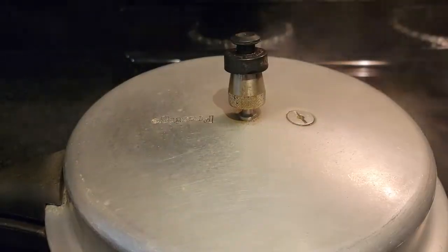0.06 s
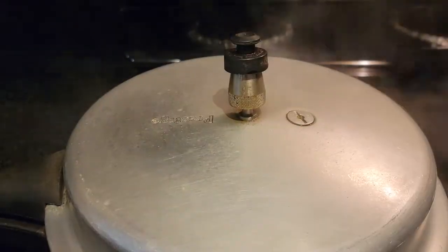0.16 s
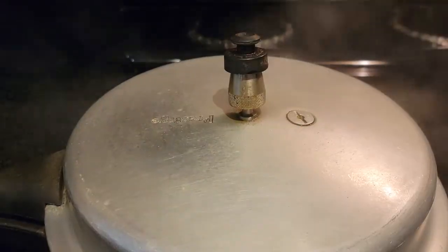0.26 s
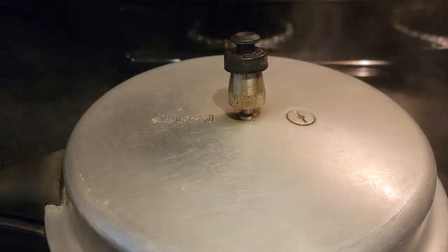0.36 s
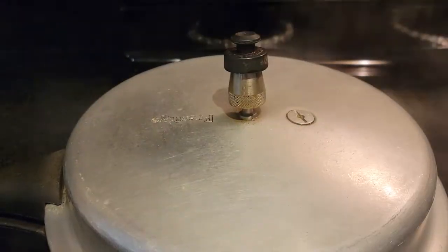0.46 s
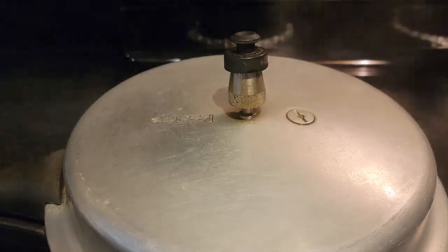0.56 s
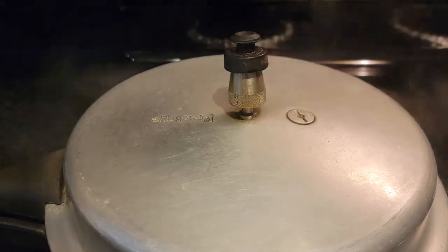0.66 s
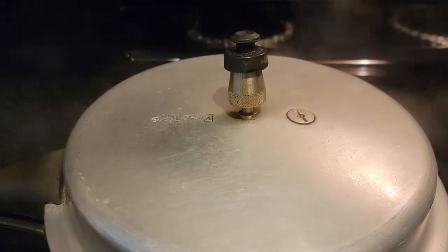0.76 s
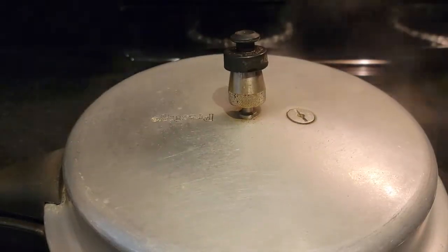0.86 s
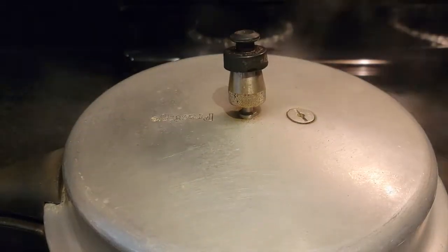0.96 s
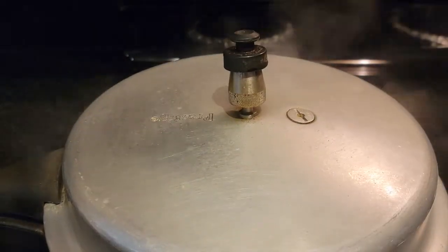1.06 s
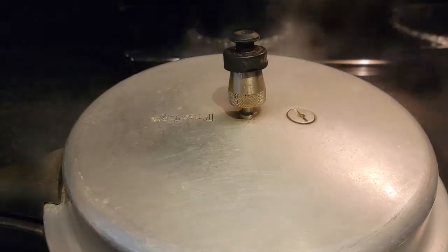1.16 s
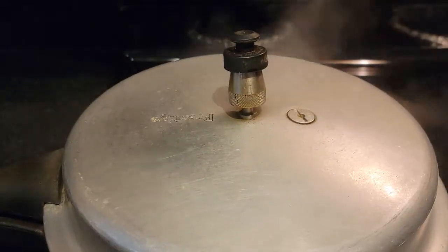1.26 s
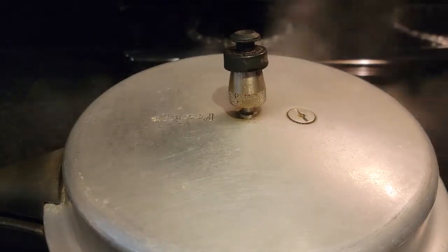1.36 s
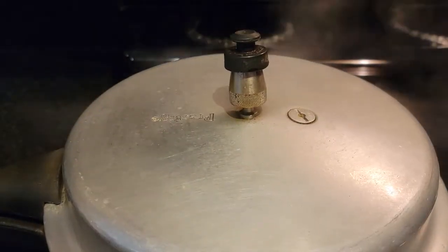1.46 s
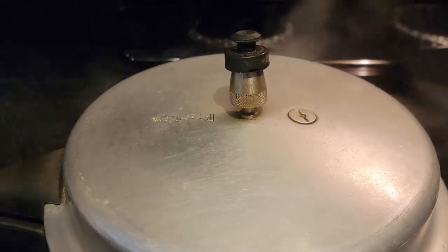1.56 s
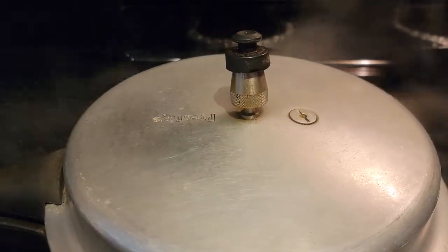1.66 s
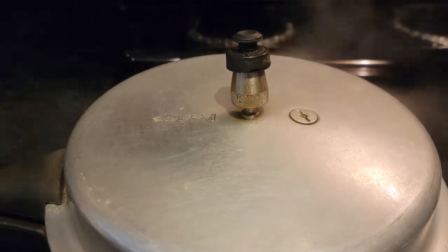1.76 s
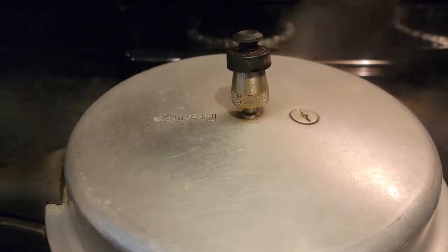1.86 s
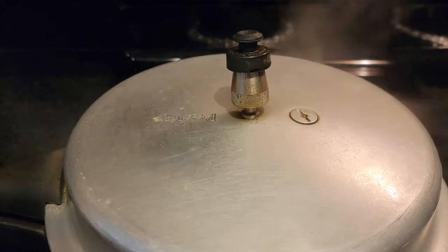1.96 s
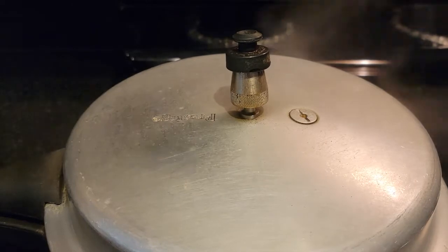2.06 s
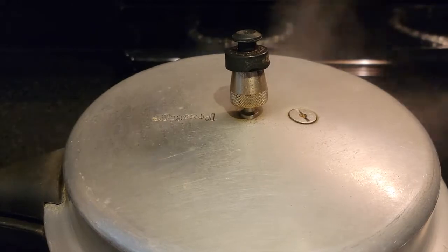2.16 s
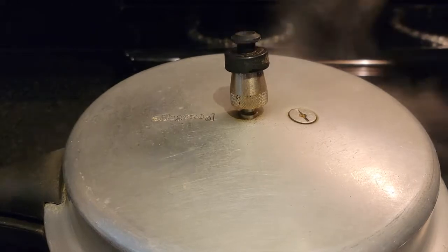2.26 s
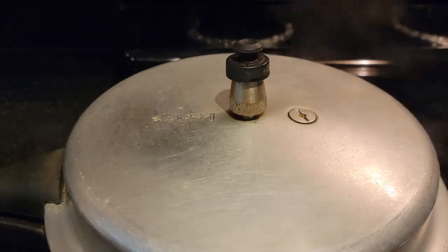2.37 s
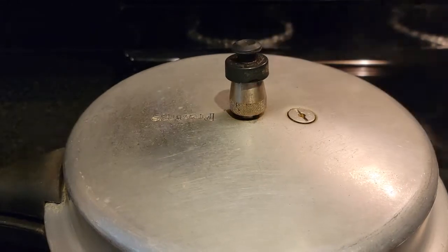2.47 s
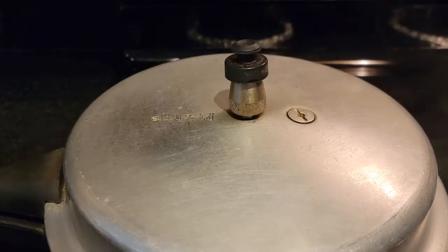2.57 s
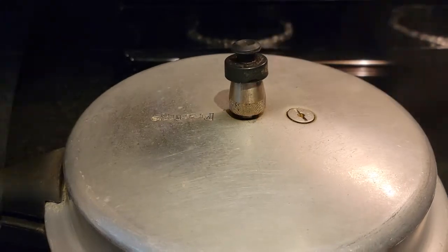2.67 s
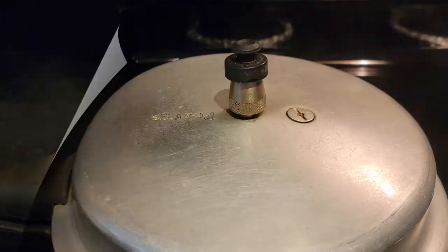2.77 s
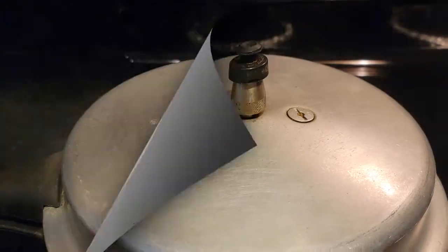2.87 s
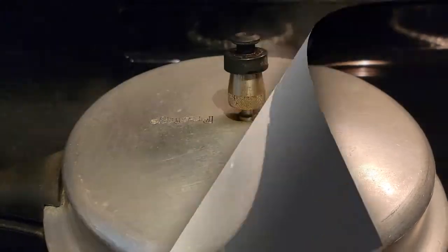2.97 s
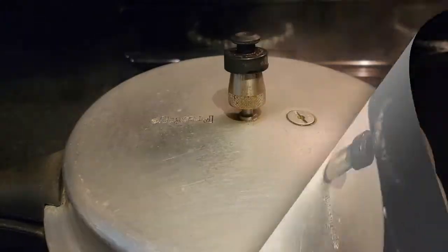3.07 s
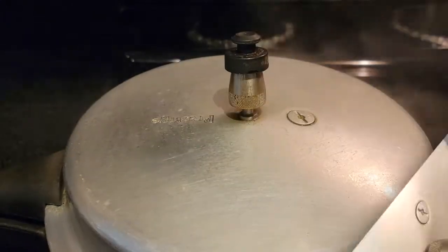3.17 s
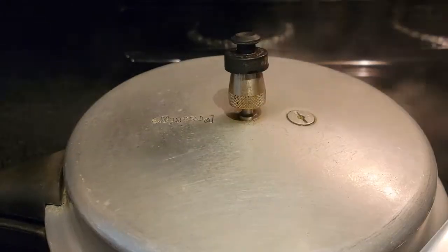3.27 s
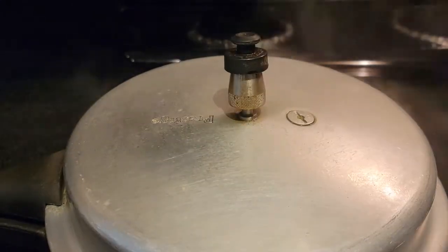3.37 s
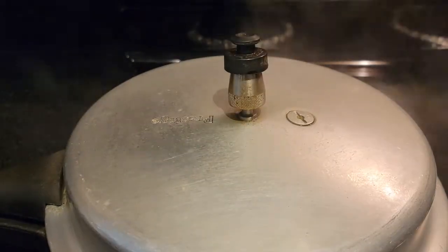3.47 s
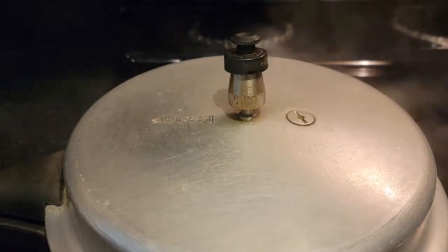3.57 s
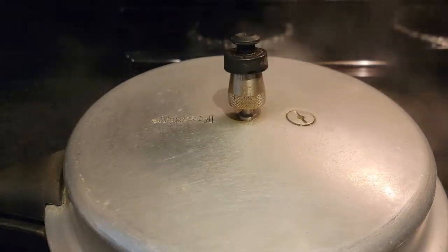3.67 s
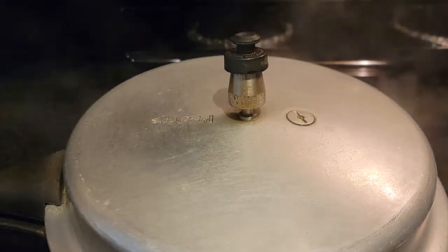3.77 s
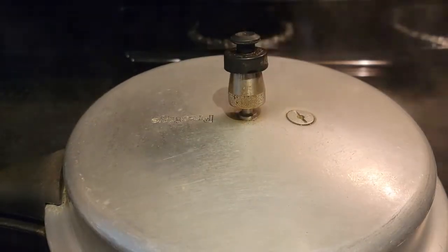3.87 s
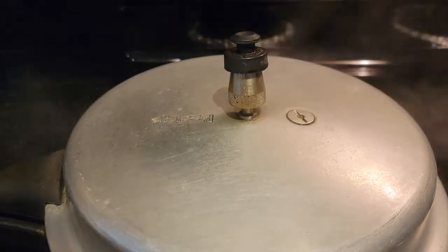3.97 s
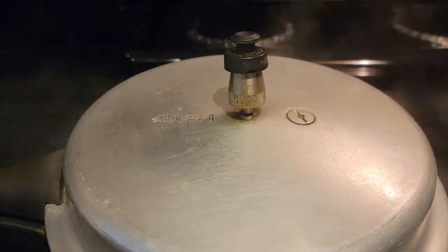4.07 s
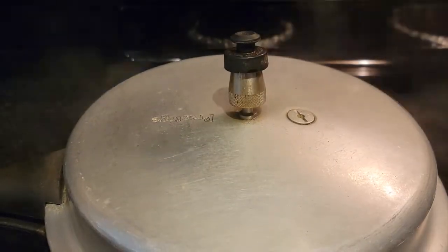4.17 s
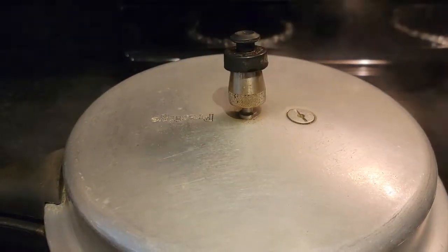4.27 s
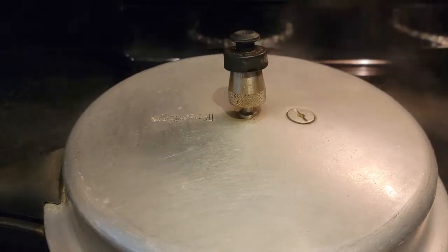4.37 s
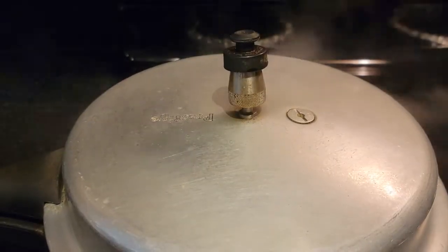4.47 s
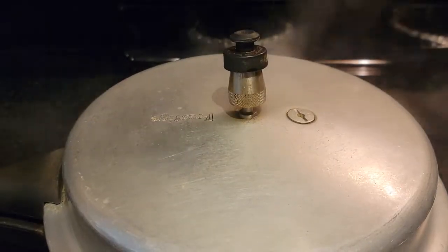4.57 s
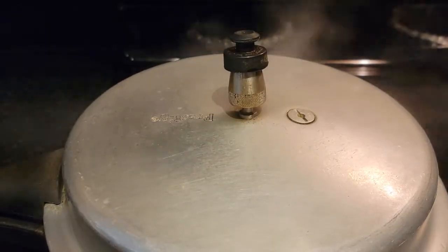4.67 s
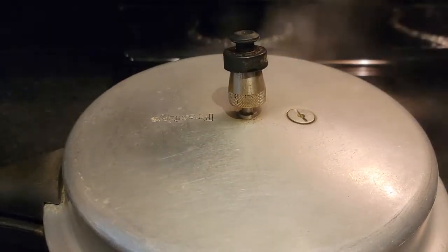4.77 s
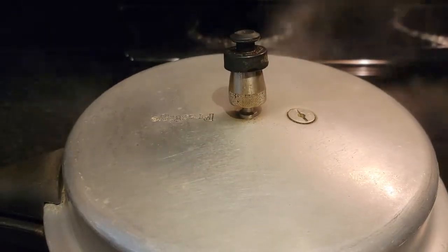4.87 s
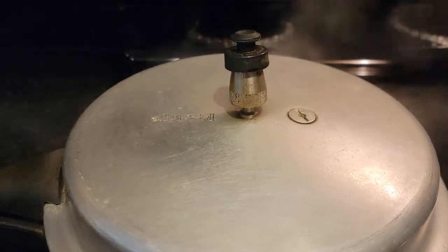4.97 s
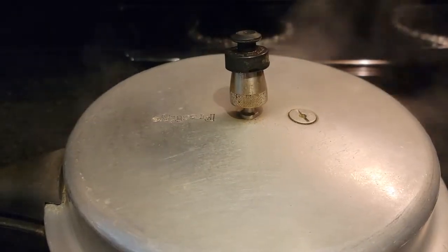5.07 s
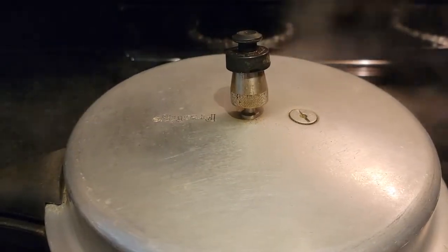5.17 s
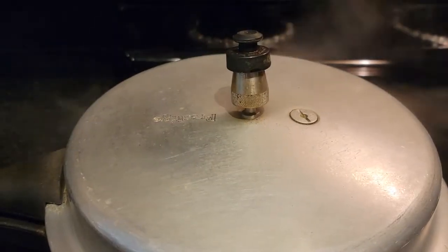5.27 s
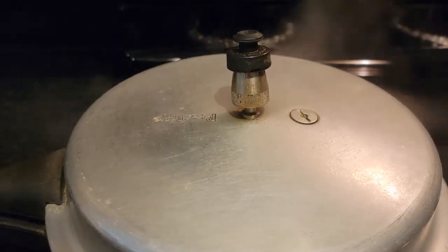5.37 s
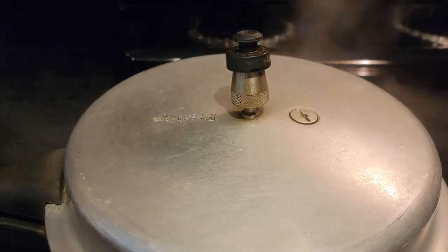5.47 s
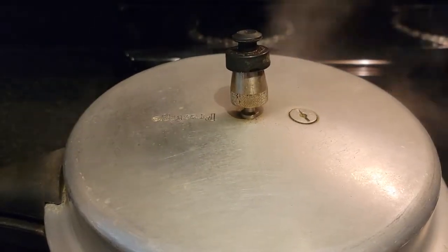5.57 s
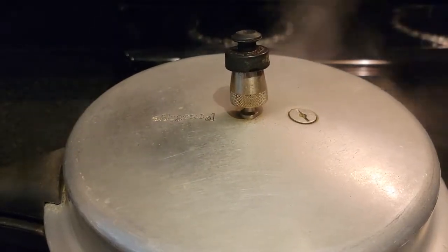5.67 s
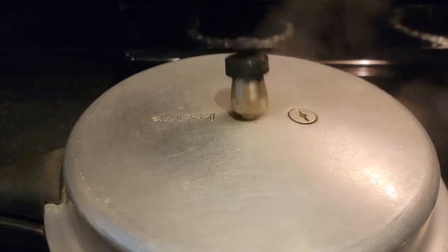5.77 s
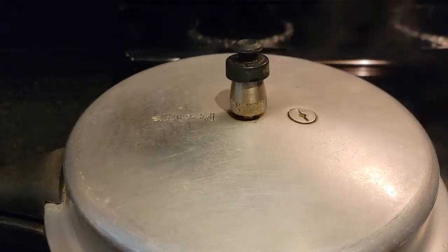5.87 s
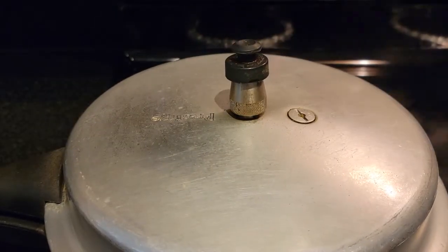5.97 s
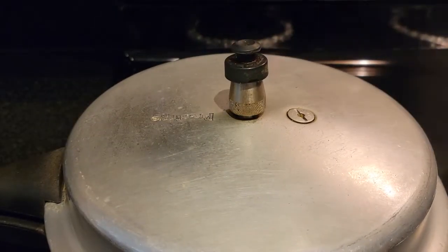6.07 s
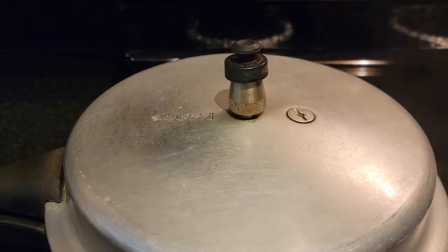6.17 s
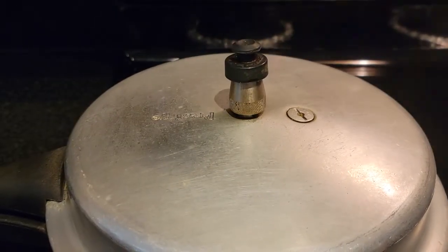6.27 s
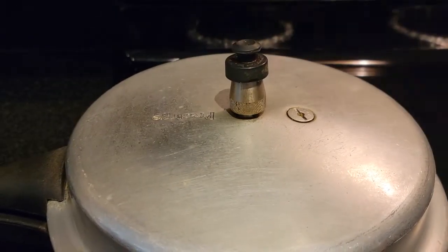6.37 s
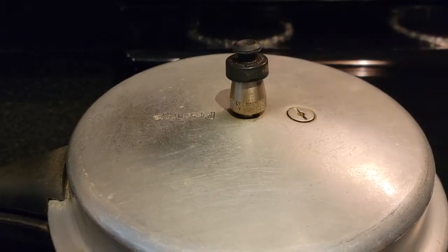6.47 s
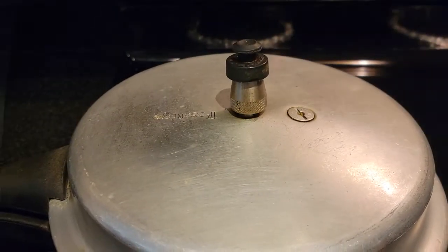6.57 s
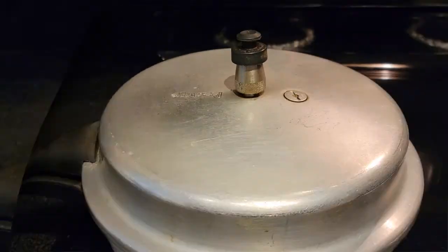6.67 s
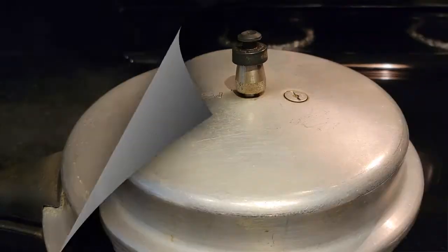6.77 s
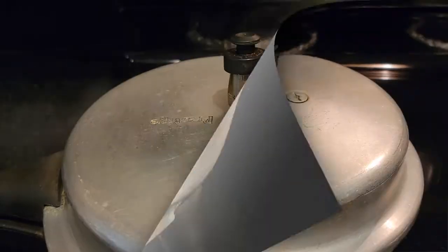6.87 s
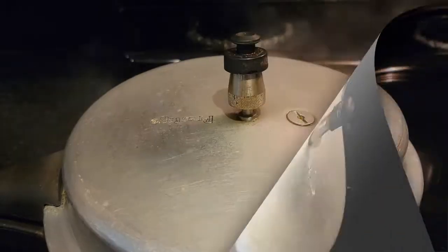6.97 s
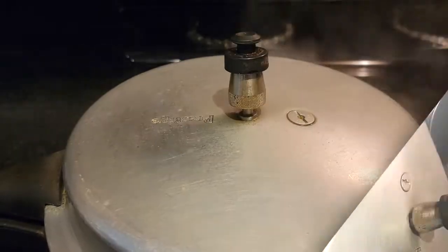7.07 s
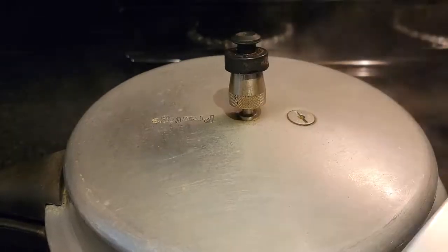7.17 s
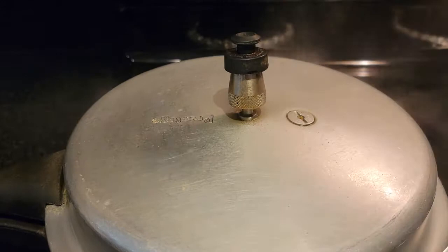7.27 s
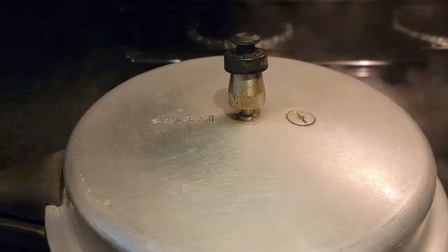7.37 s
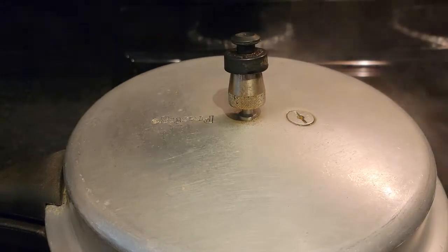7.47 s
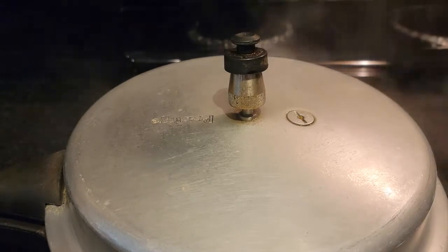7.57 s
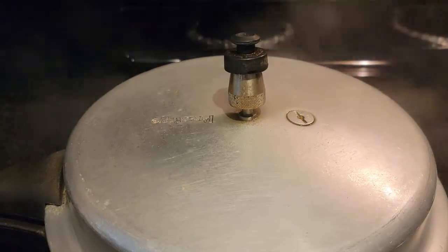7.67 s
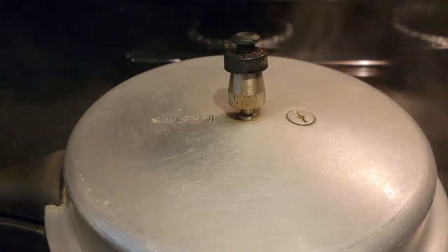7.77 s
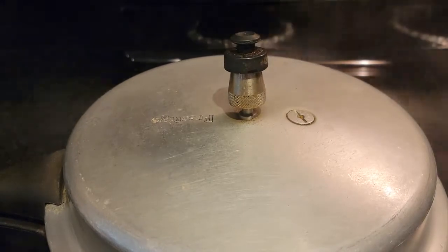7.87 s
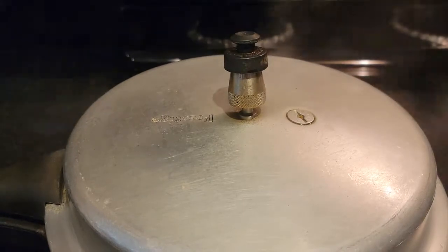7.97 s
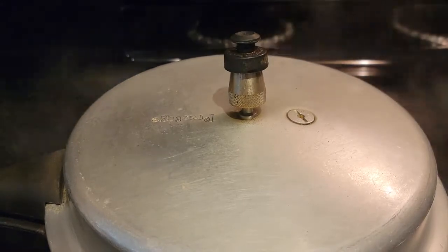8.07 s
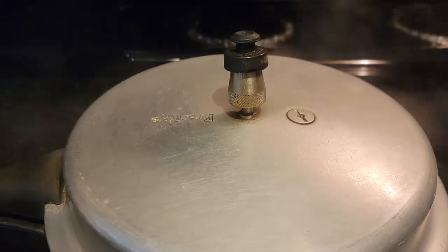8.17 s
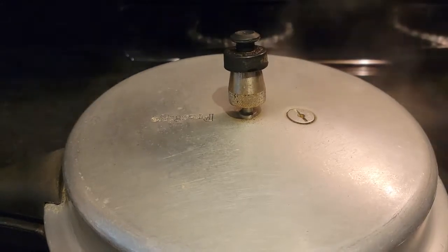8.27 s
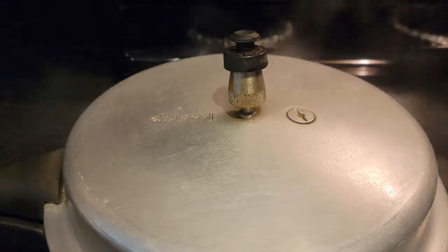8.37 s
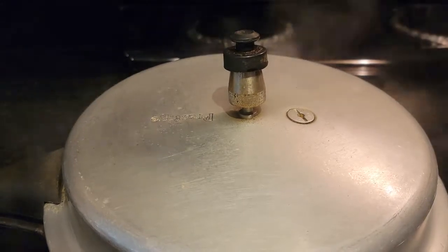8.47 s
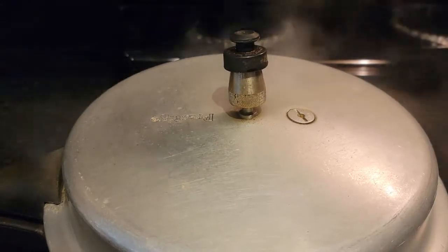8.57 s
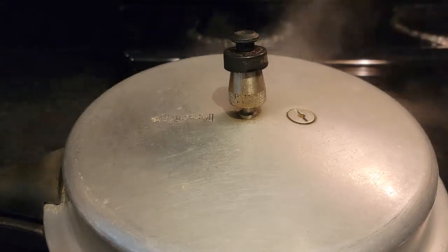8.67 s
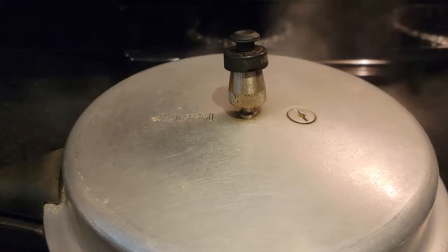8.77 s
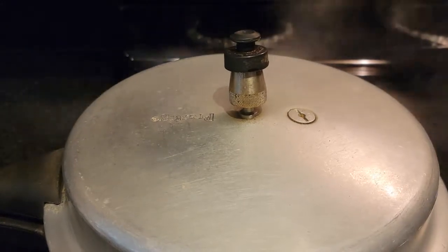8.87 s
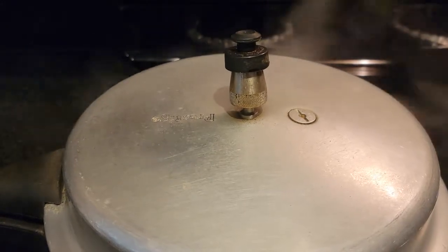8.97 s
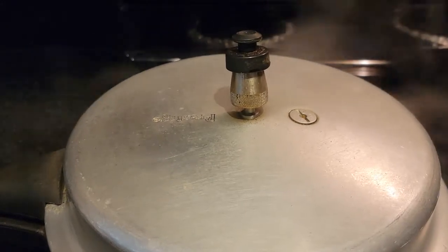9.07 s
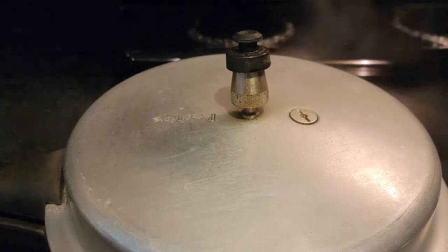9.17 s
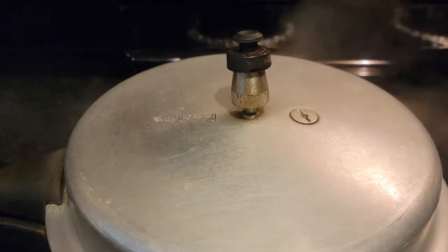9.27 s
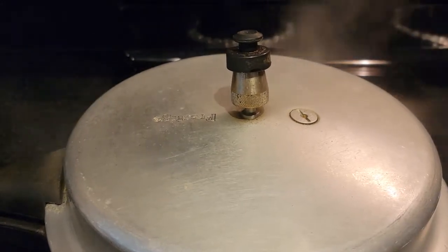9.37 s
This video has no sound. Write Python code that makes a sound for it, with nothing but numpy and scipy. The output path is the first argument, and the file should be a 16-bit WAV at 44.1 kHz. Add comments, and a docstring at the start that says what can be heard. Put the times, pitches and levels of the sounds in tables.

```python
"""A steam hiss in full flow comes first: a pressure cooker vents on a stove in a small kitchen.
The weight lands, clanks on the lid and chatters over a faint leak, a low rumble and wall echoes.
Steam and leak are coloured noise, the lid is a bank of struck resonators, the rumble is deep noise.
One release plays three times, each with a dull pop on the left: the first is joined mid-hiss, the second
runs whole from its swell, the third swells to the open hiss and stops before the weight lands."""
import sys
import numpy as np
from scipy import signal
from scipy.fft import rfft, irfft, next_fast_len
from scipy.io import wavfile

SR = 44100
rng = np.random.default_rng(int(sys.argv[2]) if len(sys.argv) > 2 else 0)


def master_out(mix):
    """Clip the mix to full scale and print it as 16-bit PCM to the path in sys.argv[1]."""
    frames = np.transpose(np.atleast_2d(mix))
    ceiling = np.clip(frames, -1, 1)
    pcm = np.round(ceiling * 32767).astype(np.int16)
    wavfile.write(sys.argv[1], SR, pcm)


N = 415863
LENGTH = next_fast_len(round(6.6 * SR), True)   # samples in which one release is built
TIME = np.arange(LENGTH) / SR   # s
HZ = np.maximum(np.arange(LENGTH // 2 + 1) * SR / LENGTH, 1)

# Colour of the low rumble: f/Hz, level/dB per Hz (relative)
RUMBLE_COLOUR = [(12, -65), (20, -23), (31, -4), (44, -0.5), (55, 11), (76, 1), (92, 8), (124, -7),
                 (220, -15.5), (290, -41), (480, -120)]
# Level of the rumble through the release: t/s, level/dB
RUMBLE_LEVEL = [(2.45, -64), (2.75, -68), (3.48, -61), (3.76, -66), (5.14, -62.5), (5.28, -70), (5.42, -62),
                (6.43, -67)]
# Colour of the leak past the seated weight: f/Hz, level/dB per Hz (relative)
LEAK_COLOUR = [(90, -30), (150, -21), (250, -17), (590, -14), (900, -26), (1290, -17), (1700, -24),
               (5250, -18), (6400, -15), (7000, -8), (7700, -14.5), (10400, -25), (12200, -18.5),
               (16000, -16.5)]
# Microphone pair: f/Hz, likeness 0-1, phase/rad by which right trails beyond the path lag
PAIR = [(25, .95, 0), (60, .9, 0), (100, .75, .1), (130, .3, .8), (300, .45, 2.2), (620, .5, 1.7),
        (900, .55, -.4), (1200, .7, .4), (2150, .5, -1.4), (2290, .6, -1), (2320, .88, .1),
        (2440, .97, .05), (2560, .96, -.1), (2610, .5, -.3), (3400, .3, -.6), (4400, .6, .7), (7000, .3, 0),
        (12500, .45, 0), (16000, .15, 0)]
# Weight against lid: t/s, level/dB (before trim and chance), lower corner f/Hz, upper corner f/Hz of the strike;
# crossed corners leave a narrow, weaker band
BLOWS = [(4.02, -31, 1170, 3500), (4.031, -30.5, 1060, 1400), (5.691, -49, 298, 1220),
         (5.709, -21, 250, 1580), (5.726, -31, 1000, 1950), (5.763, -37, 700, 3200),
         (5.798, -33, 980, 6000), (5.811, -38, 1100, 4000), (5.826, -46, 700, 1300),
         (5.847, -48, 1190, 1600), (5.972, -64, 900, 1400), (6.103, -62, 1300, 1150),
         (6.327, -54, 1300, 1150)]
# Modes of lid and weight: f/Hz, level/dB, t60/s, left minus right level/dB, direction of first swing
LID_MODES = [(290, -15, .04, -1, 1), (450, -14, .04, 0, -1), (795, -13, .14, 5, 1), (830, -2, .05, 5, 1),
             (1140, -7, .04, 3, -1), (1205, -6, .08, 3, -1), (1300, -13, .1, 2, 1), (1750, -14, .07, 2, 1),
             (1970, -19, .04, 0, -1), (2170, -19, .1, 0, 1), (2905, -5, .17, 3, -1), (3170, -8, .05, 3, 1),
             (4740, -12, .08, 0, -1), (5100, -7, .12, 0, 1), (5560, -13, .1, 0, -1)]
# Colour of the jet on each side: f/Hz, left level/dB per Hz, right level/dB per Hz (relative)
JET_COLOUR = [(151, -37, -24.5), (250, -28.5, -21.5), (430, -25, -20), (630, -28, -24), (735, -23.5, -22.5),
              (764, -19.5, -19), (874, -22, -19.5), (960, -17, -18.5), (1420, -14.5, -16),
              (1880, -15.5, -19.5), (2360, -11, -9), (2440, -10, -10), (2560, -10, -10), (2800, -2, -5),
              (3000, -6, -7.5), (3500, -1, -4), (4030, -1.5, -4), (4330, -2, 2), (4980, -3.5, -2),
              (7000, 2.5, 3), (9750, -0.5, 0.5), (10370, 2, -6), (12330, 4.5, 3.5), (13630, -0.5, 2),
              (16000, -1.5, -1)]
# Narrow tones that the jet blows up in vent and lid: f/Hz, width/Hz, left boost/dB, right boost/dB
WHISTLES = [(813, 40, 7, 2), (1160, 50, 2, 5), (2170, 150, 3, 3), (3890, 90, 4, 2), (4390, 80, 1, 4),
            (4920, 40, 3, 3), (5320, 50, 3, 6), (5860, 30, 2, 5), (5990, 44, 3, 4), (6515, 50, 5, 6),
            (6990, 40, 5, 2), (7340, 60, 3, 4), (7535, 50, 5, 8), (7710, 35, 4, 3), (7870, 35, 2, 5),
            (8240, 50, 5, 4), (8480, 50, 1, 6), (8820, 90, 1, 4), (9335, 50, 3, 5), (9535, 35, 6, 4),
            (10550, 40, 5, 1), (11460, 50, 5, 1), (12080, 40, 3, 3), (12480, 90, 3, 3)]
# Treble of the open jet, as heard 1.5 octaves above 4 kHz: t/s, level/dB
JET_TREBLE = [(2.5, 0.5), (3.2, 1), (4.2, 1), (4.36, -2.5), (4.6, -1.5), (4.8, -2), (5.3, -1.5),
              (5.62, -2.5)]
# Colour of the choked jet against the free jet: f/Hz, level/dB
CHOKED_COLOUR = [(250, 17.5), (500, 23.5), (1000, 21.5), (2000, 11.5), (2830, 4.5), (4000, -7.5), (5660, 4),
                 (8000, 1), (11300, 2.5), (16000, -1)]

RELEASE_START_S, RELEASE_END_S = 2.49, 6.427
EARLIER_S = 3.47014   # the first playing joins the release this far in
SEATS_S, SHUTS_S = 5.692, 5.797   # the weight lands, and the hiss begins to shut

LEAK_DB, LEAK_RISE_DB_PER_S, LEAK_WAVER_DB = -67, 3, 1
LEAK_LIKENESS = 0.24   # mostly diffuse: share of the pair's likeness that the leak keeps
RIGHT_LAG_MS = .202
ECHO_T60_S, ECHO_SHARE = .12, .3   # stove and near walls: decay, and share in what the sides do not share
KITCHEN_T60_S, KITCHEN_DB, WALL_CUT_HZ = 0.22, -16, 6000
POP_S, POP_DB, POP_HZ, POP_T60_S, POP_CUT_HZ = 4.9497, -39.5, 75, .04, 450
THUMP_DB, THUMP_HZ, THUMP_T60_S = -54, 118, 0.05   # low thump of the pot as the weight lands
CHATTER_DB, CHATTER_PER_S, CHATTER_RISE_S = -51.5, 1500, 0.031
CHATTER_ENDS_S, CHATTER_FALL_DB_PER_S = 5.775, -500   # the chatter starts to die, and how fast
JET_DB, BODY_DB = -28, 7.0   # opening level, and lift of the hiss below 4 kHz
MIDDLE_RISE_DB_PER_S = 1   # the hiss around 4 kHz grows while the vent stays open
SWELL_FROM_S, SWELL_S, SWELL_POWER = 2.445, 0.71, 1.45
THIN_START_DB = -1   # less hiss below 4 kHz while the jet swells in
SURGE_S, SURGE_WIDTH_S, SURGE_DB = 5.68, 0.0057, 1.5   # last puff as the weight comes down
CHOKE_DB, CHOKE_S, SAG_DB_PER_S = -6.5, 0.027, -73   # landing chokes the jet; it sags until it begins to shut
SHUT_DB_PER_S, DULLS_DB_PER_S = -380, -75   # brief fast fall as the hiss shuts; treble fall from landing on
LINGER_DB, LINGER_DB_PER_S = -1, -170   # after about 2 dB the whole hiss dies more slowly
CUTOFF_HZ = 15730


def from_db(db):
    """Decibels to gain."""
    return 10 ** (np.asarray(db) / 20)


def rms_one(x):
    """Scales to unit rms."""
    return x / np.sqrt(np.mean(x ** 2) + 1e-20)


def in_time(rows):
    """Each column of a curve, sample by sample."""
    s, *columns = np.transpose(rows)
    return [np.interp(TIME, s, c) for c in columns]


def in_hz(rows):
    """Each column of a spectrum table, bin by bin along log frequency."""
    hz, *columns = np.transpose(rows)
    return np.array([np.interp(np.log(HZ), np.log(hz), c) for c in columns])


def bands(centres):
    """Each centre with its share of every bin: overlapping bands that add up to 1."""
    for k, hz in enumerate(centres):
        yield hz, np.interp(np.log(HZ), np.log(centres), np.arange(len(centres)) == k)


def drift(rate_hz):
    """Slow chance: noise through a double one-pole low-pass, spread 1."""
    step = 40   # samples between the slow values
    r = np.exp(-2 * np.pi * step * rate_hz / SR)
    noise = rng.standard_normal(LENGTH // step + 2002)
    slow = signal.lfilter([1], [1, -2 * r, r * r], noise)[2000:]   # filter start-up dropped
    return np.interp(np.arange(LENGTH) / step, np.arange(len(slow)), rms_one(slow))


def ring(clicks, hz, t60):
    """Damped resonator: a unit click sets a sine of height 1 ringing."""
    r, w = from_db(-60 / (t60 * SR)), 2 * np.pi * hz / SR
    return signal.lfilter([0, np.sin(w)], [1, -2 * r * np.cos(w), r * r], clicks + 1e-18)


def direct_paths():
    """Likeness of the two microphones, and the direct path to each: the right one is reached late."""
    alike, trail = in_hz(PAIR)
    late = np.exp(-1j * (trail + 2 * np.pi * HZ * RIGHT_LAG_MS / 1000))
    return np.clip(alike, 0, 1), np.array([np.ones_like(late), late])


def pair_noise(likeness=1):
    """Spectra of white noise at the pair: direct sound, its near echoes, and diffuse noise of each side."""
    alike, direct = direct_paths()
    alike = alike * likeness
    tail = rng.standard_normal((2, SR // 2)) * from_db(-60 * TIME[:SR // 2] / ECHO_T60_S)
    echoes = rfft(rms_one(tail) / np.sqrt(SR // 2), LENGTH)   # unit energy, other echoes on each side
    source, *diffuse = rfft(rng.standard_normal((3, LENGTH)))
    unlike = np.sqrt(ECHO_SHARE) * echoes * source + np.sqrt(1 - ECHO_SHARE) * np.array(diffuse)
    return np.sqrt(alike) * direct * source + np.sqrt(1 - alike) * unlike


def rumble():
    """Low rumble: smooth noise of one colour, its level rising and falling slowly."""
    noise = irfft(from_db(in_hz(RUMBLE_COLOUR)) * pair_noise(), LENGTH)
    return from_db(in_time(RUMBLE_LEVEL)[0]) * rms_one(noise)


def kitchen(x):
    """Wall echoes: a decaying noise tail of its own for each side, dull at the top."""
    t = np.arange(round(.6 * SR)) / SR
    tail = rng.standard_normal((2, len(t))) * from_db(-60 * t / KITCHEN_T60_S)
    tail *= t > .004   # gap before the first wall echo
    tail = signal.sosfilt(signal.butter(1, WALL_CUT_HZ, fs=SR, output="sos"), tail)
    tail /= np.sqrt(np.sum(tail ** 2, axis=1, keepdims=True))
    return from_db(KITCHEN_DB) * signal.fftconvolve(x, tail, axes=1)[:, :LENGTH]


def leak():
    """Faint hiss that grows from when the jet begins to shut; each octave wavers on its own."""
    spectrum = from_db(in_hz(LEAK_COLOUR)) * pair_noise(LEAK_LIKENESS)
    hiss = 0
    for _, share in bands(250 * 2 ** np.arange(7)):
        hiss = hiss + from_db(LEAK_WAVER_DB * drift(12.0)) * irfft(share * spectrum, LENGTH)
    level_db = LEAK_DB + LEAK_RISE_DB_PER_S * np.maximum(TIME - SHUTS_S, 0)
    return from_db(level_db) * rms_one(hiss)


def pop():
    """One dull pop of air: a sharp inward pull with a slower rebound, on the left side only."""
    t = np.maximum(TIME - POP_S, 0)
    pull = -from_db(POP_DB - 60 * t / POP_T60_S) * np.cos(2 * np.pi * POP_HZ * t) * (TIME >= POP_S)
    dull = signal.sosfilt(signal.butter(2, POP_CUT_HZ, fs=SR, output="sos"), pull)
    return dull * np.array([[1], [0]])


def chatter():
    """Strength of the small bounces: rises on landing, holds, then dies away."""
    rise = np.clip((TIME - SEATS_S) / CHATTER_RISE_S, 0, 1)
    return rise ** 2 * from_db(CHATTER_DB + CHATTER_FALL_DB_PER_S * np.maximum(TIME - CHATTER_ENDS_S, 0))


def weight():
    """Each blow, and a dense chatter of small ones, strikes every mode with a strength of its own."""
    modes = np.array(LID_MODES)[:, 0]
    struck = np.zeros((len(modes), LENGTH))
    for s, level_db, low_hz, high_hz in BLOWS:
        # the strike fades below its lower corner and above its upper one
        reach = 1 / np.sqrt((1 + (modes / high_hz) ** 4) * (1 + (low_hz / modes) ** 12))
        strength_db = level_db - 3 + rng.normal(0, 1.5, len(modes))
        struck[:, round(s * SR)] = from_db(strength_db) * reach
    taps = (rng.random(LENGTH) < CHATTER_PER_S / SR) * chatter()

    clank = np.zeros((2, LENGTH))
    for clicks, (hz, level_db, t60, pan_db, swing) in zip(struck, LID_MODES):
        tone = swing * ring(clicks + taps * rng.standard_normal(LENGTH), hz, t60)
        clank += from_db(level_db + np.array([[pan_db / 2], [-pan_db / 2]])) * tone
    radiated = HZ ** 2 / (HZ ** 2 + 300 ** 2)   # a small lid radiates little bass
    clank = irfft(rfft(clank) * radiated * direct_paths()[1], LENGTH)

    landing = from_db(THUMP_DB) * (np.arange(LENGTH) == round(SEATS_S * SR))
    return clank + ring(landing, THUMP_HZ, THUMP_T60_S)


def vent():
    """Level, treble tilt, body tilt and choking (0-1) of the jet: swell, open flow, puff, choke, shut."""
    swell = np.clip((TIME - SWELL_FROM_S) / SWELL_S, 1e-4, 1) ** SWELL_POWER
    surge_db = SURGE_DB * np.exp(-.5 * ((TIME - SURGE_S) / SURGE_WIDTH_S) ** 2)
    landed = np.maximum(TIME - SEATS_S, 0)   # s since landing
    shutting = np.maximum(TIME - SHUTS_S, 0)   # s since the hiss began to shut
    choke = np.clip((TIME - SEATS_S) / CHOKE_S + .5, 0, 1)
    choke_db = CHOKE_DB * choke + SAG_DB_PER_S * (landed - shutting)
    shut_db = np.maximum(SHUT_DB_PER_S * shutting, LINGER_DB + LINGER_DB_PER_S * shutting)
    middle_db = MIDDLE_RISE_DB_PER_S * np.clip(TIME - SWELL_FROM_S, 0, SEATS_S - SWELL_FROM_S)
    jet_db = JET_DB + middle_db + 20 * np.log10(swell) + surge_db + choke_db + shut_db
    treble_db = in_time(JET_TREBLE)[0] + surge_db + DULLS_DB_PER_S * landed
    body_db = (BODY_DB - middle_db + THIN_START_DB * (1 - swell)) * (1 - choke)
    return jet_db, treble_db, body_db, choke


def jet(gust_db, flicker_db, spit_db):
    """Turbulent hiss with faint whistles; gusts move all the treble, each band flickers, droplets roughen it."""
    jet_db, treble_db, body_db, choke = vent()
    colour = from_db(in_hz(JET_COLOUR))
    for hz, width, *boost_db in WHISTLES:
        peak = 1 / (1 + (2 * (HZ - hz) / width) ** 2)
        colour *= 1 + np.outer(from_db(boost_db) - 1, peak)
    spectrum = colour * pair_noise()

    choked_hz, choked_db = np.transpose(CHOKED_COLOUR)
    gust, hiss = drift(4.7), 0
    for hz, share in bands(250 * 2 ** np.arange(0, 6.1, .5)):
        high = np.clip(np.log2(hz / 4000), 0, 2)   # octaves above the jet's middle
        low = np.clip(np.log2(4000 / hz), 0, 1)   # octaves below it, one at most
        tilt_db = (treble_db / 1.5 + gust_db * gust) * high + body_db * low
        tilt_db = tilt_db + choke * np.interp(np.log(hz), np.log(choked_hz), choked_db)
        hiss = hiss + from_db(tilt_db + flicker_db * drift(14.4)) * irfft(share * spectrum, LENGTH)
    return from_db(jet_db + spit_db * drift(200.0)) * rms_one(hiss)


def played_thrice(release):
    """The release at its three times, each joined to the next by a short cross-fade."""
    fade_s = .06
    corners_s = [RELEASE_START_S - fade_s, RELEASE_START_S, RELEASE_END_S - fade_s, RELEASE_END_S]
    gate = np.interp(TIME, corners_s, [0, 1, 1, 0])
    piece = release * np.sqrt(gate)
    later = round((RELEASE_END_S - RELEASE_START_S) * SR)
    first = release[:, round(EARLIER_S * SR):]
    count = first.shape[1]
    out = np.zeros((2, N))
    out[:, :count] += first * np.sqrt(1 - gate[:count]) * (TIME[:count] < RELEASE_START_S)
    out[:, :LENGTH] += piece
    out[:, later:] += piece[:, :N - later]
    return out


def scene():
    """Rumble, leak, pop, weight with its wall echoes, and jet, played three times."""
    clank = weight()
    steam = jet(gust_db=0.5, flicker_db=1.0, spit_db=0.17)
    return played_thrice(rumble() + leak() + pop() + clank + kitchen(clank) + steam)


def record(dry):
    """The top is cut steeply by an elliptic low-pass."""
    return signal.sosfilt(signal.ellip(16, .5, 75, CUTOFF_HZ, fs=SR, output="sos"), dry)


dry = scene()
out = record(dry)
master_out(out)
```